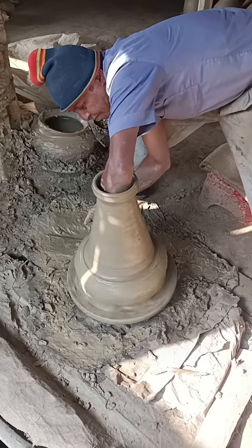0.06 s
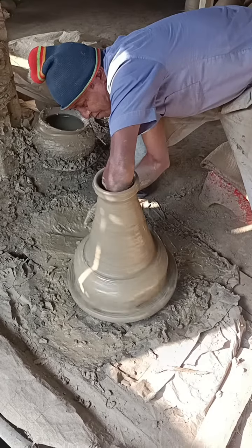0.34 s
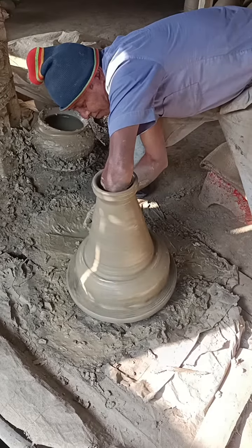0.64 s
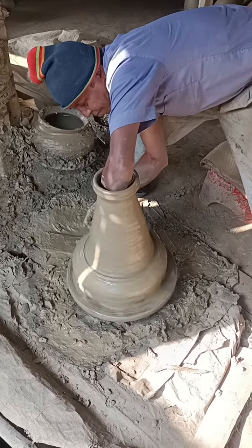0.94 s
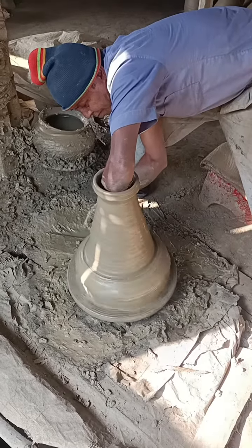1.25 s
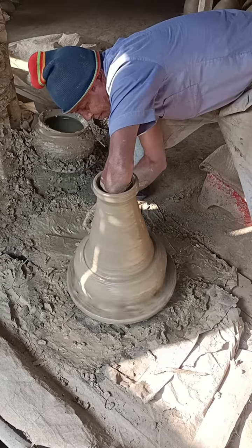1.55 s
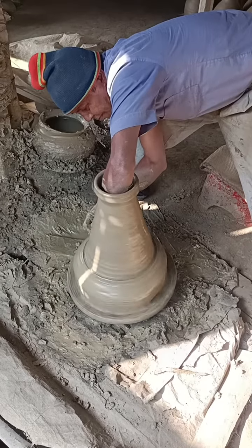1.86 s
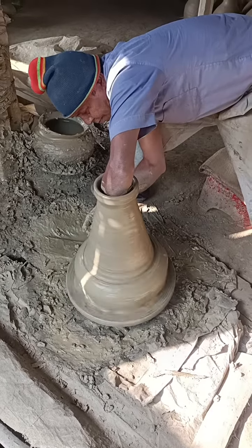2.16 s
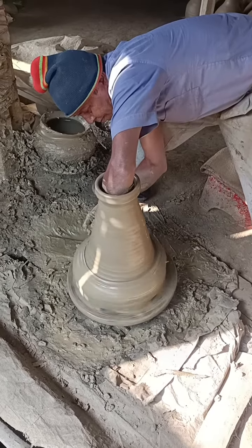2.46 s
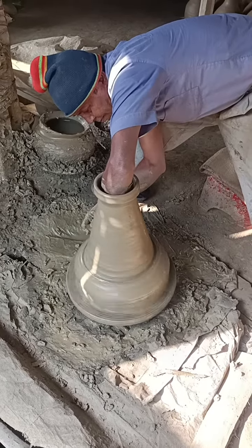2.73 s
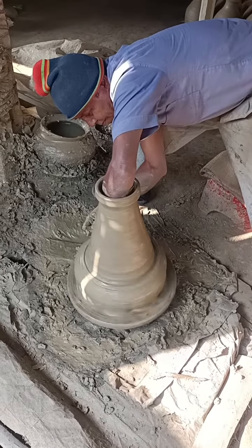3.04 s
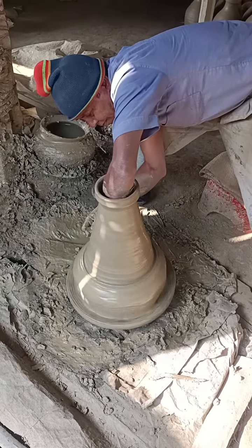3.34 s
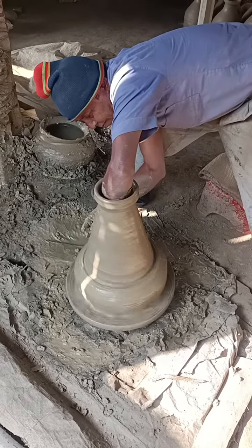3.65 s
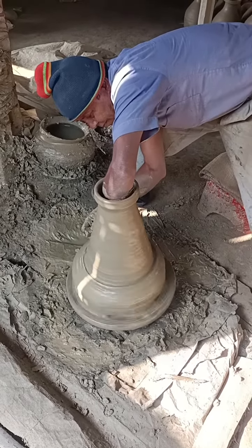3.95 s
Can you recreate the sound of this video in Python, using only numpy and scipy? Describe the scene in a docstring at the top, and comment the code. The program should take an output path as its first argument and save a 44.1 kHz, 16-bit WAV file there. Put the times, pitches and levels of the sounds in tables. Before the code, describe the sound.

An electric pottery wheel runs for the whole four seconds, a throbbing mid-pitched motor whine over a low hum and whir. A loose part ticks and knocks rapidly and unevenly throughout, busier after 2 seconds. The wheel rumbles in soft swells, and wet clay crackles very faintly. Tiny high squeaks pass around 1.6 to 1.9 seconds, then faint lower mechanical groans near 2.8 and 3.1 seconds.

```python
"""A steady, throbbing motor whine over a low hum: an electric pottery wheel turns on a workshop floor.
The whine comes from rotor slots passing the pulsing field; under it the bearings and drive rub and whir.
Wet clay crackles finely under the hands, and a loose drive part knocks the frame once a turn, often hard.
The heavy wheel rumbles in swells as it comes round. A few tiny squeaks pass near the middle,
and faint low moans follow."""
import sys
import numpy as np
from scipy import signal
from scipy.fft import rfft, irfft
from scipy.io import wavfile
from scipy.ndimage import uniform_filter1d

SR = 44100
rng = np.random.default_rng(int(sys.argv[2]) if len(sys.argv) > 2 else 0)


def pcm_store(signal):
    """Save signal as 16-bit PCM."""
    levels = np.round(np.clip(np.atleast_2d(signal), -1, 1) * 32767)
    wavfile.write(sys.argv[1], SR, levels.astype(np.int16).T)


N = 176400
TIME, FREQS = np.arange(N) / SR, np.fft.rfftfreq(N, 1 / SR)
SHAFT_HZ, MAINS_HZ = 25.21, 50.6
KNOCK_TURN = .42  # how far into each turn the loose part strikes

# The motor's steady hum. Each row: multiple of half the mains frequency, level in dB.
HUM_LINES = [(2, -64.5), (3, -55.5), (5, -64.5), (6, -65), (7, -59.5), (8, -56), (9, -56.5), (10, -66.5),
             (11, -62), (12, -63), (13, -58), (14, -70), (16, -68.5), (17, -58.5), (18, -67.5)]
# The load riding the hum at twice the mains frequency. Each row: time in seconds, left level in dB.
LOAD_CURVE = [(0, -47), (.35, -49), (.5, -46.5), (1, -44), (1.25, -41.5), (1.5, -45.5), (2, -47),
              (2.2, -50), (2.6, -49.5), (3, -47.5), (3.4, -43), (4, -46)]
# Rotor slot whine and its sidebands. Each row: shaft order, mains multiple added to it,
# left and right levels in dB, left phase lead in radians.
WHINE_LINES = [(33, -1, -51, -48, -.9), (34, -1, -49, -44, -1.1), (35, -1, -42, -40, -1.6),
               (36, -1, -27.4, -39, 0), (37, -1, -39, -47, -1.2), (35, 1, -52, -42, 2.8),
               (36, 1, -34.5, -30, -1.9), (37, 1, -46, -36, -1.7), (38, 1, -48, -43, 3.1),
               (36, 3, -49, -43, -2.1), (38, 5, -59, -54, -2.8)]
# The fader on the tone that makes the whine throb. Each row: time in seconds, gain in dB.
THROB_CURVE = [(0, 4.5), (.3, 8), (.65, 7), (1, -4), (1.55, 5.5), (2.05, -4.5), (2.55, 4), (3.1, -2),
               (3.65, 1), (4, -4)]
# Bearing resonances. Each row: centre and width in Hz, left and right levels in dB.
BEARING_BANDS = [(696.6, 13, -50, -47), (799, 26, -46.5, -43), (1167, 18, -52, -50), (1626, 56, -55, -74),
                 (1944, 45, -52.5, -67), (2148, 18, -58.5, -51), (2198, 40, -56, -56), (2313, 22, -52, -58),
                 (3553, 32, -63.5, -62), (3814, 27, -58.5, -68.5)]
# Steady whir and hiss as the microphones hear it, with a different treble notch on each side.
# Each row: frequency in Hz, left and right densities in dB per Hz before trim.
WHIR_AT_MICS = [(25, -85.5, -84), (50.4, -79.5, -77.5), (90.5, -67, -73), (139, -79, -71.5),
                (252, -76.5, -76), (367, -78, -77), (500, -77.5, -70), (667, -72, -70.5), (848, -59.5, -59),
                (916, -66.5, -60), (1084, -62.5, -71), (1190, -76, -70), (1530, -74, -75.5),
                (2170, -77, -80.5), (2460, -83, -84.5), (3330, -89.5, -88), (3740, -85.5, -77.5),
                (4285, -95, -92.5), (5170, -99, -89), (5740, -93.5, -79), (6940, -121, -92),
                (7640, -101, -94), (9300, -99, -106), (10200, -100, -125), (11450, -110, -111),
                (12300, -104, -100), (14000, -122, -99), (15400, -125, -97.5)]
# The whir's stereo image. Each row: frequency in Hz, left-right likeness from 0 (wide) to 1 (narrow).
WHIR_LIKENESS = [(50, 1), (110, 0.84), (200, 0.88), (380, 0.59), (800, 1), (1300, 0.31), (2400, 0.5),
                 (4400, .25), (12000, .1)]
# Hard hits of the loose part. Each row: start in seconds before a short delay, strength in dB.
HARD_KNOCKS = [(0.012, -32), (0.088, -30), (0.138, -27), (0.207, -35), (0.256, -29.5), (0.333, -27.5),
               (0.453, -28), (0.571, -28.5), (0.69, -28.5), (0.809, -30), (0.929, -30), (1.046, -29.5),
               (1.167, -29), (1.286, -29), (1.334, -34.0), (1.361, -28.5), (1.488, -30), (1.565, -33.5),
               (1.607, -33), (1.645, -38), (1.764, -30), (1.844, -27.5), (1.963, -31), (2.004, -30.5),
               (2.041, -32), (2.083, -39), (2.117, -31.5), (2.192, -27.5), (2.242, -27.5), (2.278, -28.5),
               (2.349, -29.5), (2.4, -26.5), (2.469, -31), (2.519, -32), (2.56, -33), (2.6, -36),
               (2.631, -35), (2.677, -30), (2.713, -27), (2.785, -31), (2.834, -25.5), (2.951, -25),
               (3.073, -29), (3.145, -31.5), (3.227, -30), (3.306, -27), (3.357, -29), (3.384, -27.5),
               (3.465, -27.5), (3.516, -38), (3.542, -28), (3.594, -29), (3.625, -29.5), (3.749, -32),
               (3.824, -30.5), (3.898, -29.5), (3.947, -34)]
# The frame's ring. Each row: pitch in Hz, left and right gains in dB, seconds to fall by 60 dB.
FRAME_MODES = [(667, -6, -4, 0.032), (1077, -9.5, 5, 0.05), (1137, 1.5, 1.5, 0.036), (1300, -2, 6.5, 0.02),
               (1410, 0.5, 8, 0.012), (1590, -8, 0, 0.016), (1900, -15, -14.5, 0.017),
               (2696, -16.5, -25, 0.026), (2805, -17.5, -15.5, 0.045), (4190, -21, -16.5, .014),
               (5910, -22, -9, 0.01)]
# The wheel's swells. Each row: peak time and half-height width in seconds, bass and body levels in dB.
RUMBLE_SWELLS = [(0.04, 0.11, -50, -46), (.52, 0.17, -51, -66), (1.135, 0.2, -54, -63),
                 (1.335, 0.12, -50, -51.5), (1.883, 0.16, -51, -62), (2.583, 0.13, -48, -54),
                 (2.965, 0.15, -50, -44), (3.43, 0.098, -60, -47), (3.56, 0.09, -47, -69)]
# Squeaks and moans. Each row: peak time and length in seconds, pitch and width in Hz,
# level in dB before panning.
SQUEAKS_AND_MOANS = [(1.635, .05, 4850, 400, -54), (1.738, .018, 5000, 450, -52),
                     (1.818, .016, 5030, 300, -51), (1.862, .016, 5020, 300, -50),
                     (1.902, .016, 4980, 300, -55), (2.72, .07, 635, 20, -48), (2.78, .14, 595, 14, -42),
                     (3.11, .12, 520, 20, -47)]


def amp(db):
    """Decibels to gain."""
    return 10 ** (np.asarray(db) / 20)


def unit_rms(x):
    """Scales to rms 1."""
    return x / np.sqrt(np.mean(x ** 2) + 1e-20)


def spectrum(rows, column=1):
    """Spreads one column of a table over FREQS on a log-frequency axis."""
    table = np.array(rows, float)
    return np.interp(np.log(FREQS + 1), np.log(table[:, 0] + 1), table[:, column])


def add(mix, start_s, sound):
    """Drops a sound into the mix."""
    part = mix[..., max(round(start_s * SR), 0):][..., :sound.shape[-1]]
    part += sound[..., :part.shape[-1]]


def band(centre_hz, width_hz):
    """Noise in one steep resonance, rms 1."""
    rolloff = 1 + (2 * (FREQS - centre_hz) / width_hz) ** 2
    return unit_rms(irfft(rfft(rng.standard_normal(N)) / rolloff, N))


def wander(rate_hz):
    """A random control curve moving mostly below rate_hz, rms about 1."""
    bins = rfft(rng.standard_normal(1000))
    hz = FREQS[:len(bins)]
    curve = unit_rms(irfft(bins * (hz > 0) / (1 + (hz / rate_hz) ** 2)))
    return np.interp(np.linspace(0, 1, N), np.linspace(0, 1, len(curve)), curve)


def swell(peak_s, width_s):
    """A smooth rise and fall, width_s wide at half height."""
    return np.cos(np.pi / 2 * np.clip((TIME - peak_s) / width_s, -1, 1)) ** 2


def left_phase(hz, lag_s=.00028):
    """Phase shift in radians of motor sound reaching the left side late."""
    return -2 * np.pi * hz * lag_s


def hum_tone(hz, left_db, right_db, waver=.2):
    """One stereo line of the hum, wavering in level and drifting in phase."""
    phase = 2 * np.pi * (hz * TIME + rng.random()) + .3 * wander(2.0)
    pair = np.array([amp(left_db) * np.cos(phase + left_phase(hz)), amp(right_db) * np.cos(phase)])
    return np.sqrt(2) * (1 + waver * wander(.74)) * pair


def motor_hum():
    """Low motor harmonics, mains hum that follows the load, and a shaft drone that swells once."""
    steady = sum(hum_tone(multiple * MAINS_HZ / 2, db, db) for multiple, db in HUM_LINES)
    load = amp(np.interp(TIME, *np.transpose(LOAD_CURVE)))
    mains = load * hum_tone(2 * MAINS_HZ, 0, -2, waver=.069)
    drone = sum(hum_tone(order * SHAFT_HZ, db, db) for order, db in ((9, -50), (10, -55)))
    return steady + mains + swell(peak_s=2.31, width_s=.68) * drone


def rotor_whine(throb_hz=11.53, dip_s=.1594, wobble_rad=2.0):
    """Rotor slots pass the pulsing field; the speed wobbles once a turn and adds sidebands."""
    drift = .72 * wander(1.0)  # radians, shared by all lines
    slots, main_multiple, *_ = max(WHINE_LINES, key=lambda row: row[2])

    def line(phase, left_db, right_db, lead):
        left = amp(left_db) * np.cos(phase + drift)
        right = amp(right_db) * np.cos(phase + drift - lead)
        return np.sqrt(2) * (1 + .051 * wander(5.8)) * np.array([left, right])

    def phase_of(order, multiple):
        hz = order * SHAFT_HZ + multiple * MAINS_HZ
        sideband = order - slots  # the wobble is locked to the knock's place in the turn
        return 2 * np.pi * (hz * TIME - sideband * KNOCK_TURN) - wobble_rad * abs(sideband)

    whine = sum(line(phase_of(order, multiple), *stereo) for order, multiple, *stereo in WHINE_LINES)
    # A tone just under the loudest line beats against it.
    throb_phase = phase_of(slots, main_multiple) - 2 * np.pi * throb_hz * (TIME - dip_s) + np.pi
    fader = amp(np.interp(TIME, *np.transpose(THROB_CURVE)))
    return whine + fader * line(throb_phase, left_db=-38, right_db=-42, lead=-1.33)


def shaft_pulse(peak_turn):
    """A cosine that crests once a turn, peak_turn of the way round."""
    return np.cos(2 * np.pi * (SHAFT_HZ * TIME - peak_turn))


def bearings(pulse_db=.5):
    """Faint fuzzy tones: narrow resonances that the bearings rub harder once a turn."""
    tones = np.zeros((2, N))
    for hz, width_hz, left_db, right_db in BEARING_BANDS:
        pan = np.array([[amp(left_db) * np.exp(1j * left_phase(hz))], [amp(right_db)]])
        tones += (pan * signal.hilbert(band(hz, width_hz))).real
    return amp(pulse_db * shaft_pulse(.76)) * tones


def patchy_noise(patch_db=1.2, size=1024):
    """Two noises sharing soft random patches of level across time and pitch, rms 1."""
    hop = size // 4
    real_a, imag_a, real_b, imag_b, patches = rng.standard_normal((N // hop + 5, size // 2 + 1, 5)).T
    patches = unit_rms(uniform_filter1d(uniform_filter1d(patches, 10, axis=0), 10, axis=1))
    frames = np.array([real_a + 1j * imag_a, real_b + 1j * imag_b]) * amp(patch_db * patches)
    return unit_rms(signal.istft(frames, nperseg=size, noverlap=size - hop)[1][:, :N])


def drive_whir(trim_db=.5, crossover_hz=900, race_hz=104.5):
    """The drive rubs; its treble flickers, pulses with the shaft and ripples with the bearing balls."""
    shared, separate = rfft(patchy_noise())
    likeness = spectrum(WHIR_LIKENESS)
    left = (likeness * shared + np.sqrt(1 - likeness ** 2) * separate) * np.exp(1j * left_phase(FREQS))
    at_mics = amp([spectrum(WHIR_AT_MICS, 1), spectrum(WHIR_AT_MICS, 2)]) * np.sqrt(SR / 2)
    whir = np.array([left, shared]) * at_mics
    treble = FREQS ** 2 / (FREQS ** 2 + crossover_hz ** 2)
    ripple = np.cos(2 * np.pi * race_hz * TIME)
    flutter_db = 1.25 * wander(37) + .23 * shaft_pulse(.75) - .1 * ripple
    return amp(trim_db) * (irfft(whir * (1 - treble), N) + irfft(whir * treble, N) * amp(flutter_db))


def clay_grit(clicks_per_s=260, spread_db=2.2, decay_s=.0019):
    """Wet clay crackles under the hands: tiny random bursts of bright noise."""
    clicks = (rng.random(N) < clicks_per_s / SR) * amp(spread_db * np.minimum(rng.exponential(1, N), 4))
    bursts = signal.fftconvolve(clicks, np.exp(-TIME[:SR // 100] / decay_s))[:N]
    left = unit_rms(bursts * band(8500, 4000))
    right = unit_rms(bursts * (band(8200, 3000) + band(14200, 3000)))
    return np.array([amp(-72.5) * left, amp(-75.5) * right])


def workshop(sound, t60_s=.12, wet_db=-8):
    """Adds a short room tail, different on each side."""
    t = TIME[:SR // 3]
    tail = rng.standard_normal((2, len(t))) * amp(-60 * t / t60_s) * (t > .004)
    tail /= np.linalg.norm(tail[0])
    return sound + amp(wet_db) * signal.fftconvolve(sound, tail, axes=1)[:, :N]


def frame_ring(t, attack_s=.00091):
    """The frame answers a blow with fast-dying modes of alternating polarity."""
    ring = np.zeros((2, len(t)))
    for k, (hz, left_db, right_db, t60_s) in enumerate(FRAME_MODES):
        phase = 2 * np.pi * hz * t
        mode = np.array([amp(left_db) * np.sin(phase + left_phase(hz)), amp(right_db) * np.sin(phase)])
        ring += (-1) ** k * amp(-60 * t / t60_s) * mode
    return ring * (1 - np.exp(-t / attack_s))


def drive_knocks(delay_s=.004, scuff_s=.0025):
    """Once a turn a loose part strikes and scuffs the frame, hard on some turns, lightly on the rest."""
    hard_times = np.array(HARD_KNOCKS)[:, 0]
    turn_times = (np.arange(int(N / SR * SHAFT_HZ)) + KNOCK_TURN) / SHAFT_HZ
    light_db = rng.normal(-41.5, 2.5, len(turn_times))
    light = [(s, db) for s, db in zip(turn_times, light_db) if abs(hard_times - s).min() > .5 / SHAFT_HZ]
    t, blows, scuffs = TIME[:SR // 12], np.zeros(N), np.zeros(N)
    for start_s, db in list(HARD_KNOCKS) + light:
        add(blows, start_s + delay_s, amp([db]))
        add(scuffs, start_s + delay_s, amp(db - 30) * np.exp(-t / scuff_s) * rng.standard_normal(len(t)))
    ringing = amp(1) * signal.fftconvolve((blows + scuffs)[None], frame_ring(t), axes=1)[:, :N]
    hiss = scuffs * amp([[-24], [-17]])  # the bare scuff sits to the right
    return workshop(ringing + hiss)


def wheel_rumble():
    """The heavy wheel labours as it comes round: swells of deep bass and low body."""
    bass = sum(amp(db) * swell(peak_s, width_s) for peak_s, width_s, db, _ in RUMBLE_SWELLS)
    body = sum(amp(db) * swell(peak_s, width_s) for peak_s, width_s, _, db in RUMBLE_SWELLS)
    return bass * band(centre_hz=51, width_hz=11) + body * band(centre_hz=225, width_hz=150)


def squeaks():
    """Faint high chirps, then low moans: brief swells of narrow noise, a little to the right."""
    chirps = sum(amp(db) * swell(peak_s, length_s / 2) * band(hz, width_hz)
                 for peak_s, length_s, hz, width_hz, db in SQUEAKS_AND_MOANS)
    return workshop(chirps * amp([[-3], [1]]))


def scene():
    """The running motor is the bed; knocks, rumble, squeaks and clay sit on top."""
    bed = motor_hum() + rotor_whine() + bearings() + drive_whir()
    return bed + drive_knocks() + wheel_rumble() + squeaks() + clay_grit()


def record(dry):
    """A steep low-pass takes the very top off the mix."""
    lowpass = signal.firwin(801, cutoff=15550, window=("kaiser", 9), fs=SR)
    return signal.oaconvolve(dry, lowpass[None], "same")


dry = scene()
out = record(dry)
pcm_store(out)
```